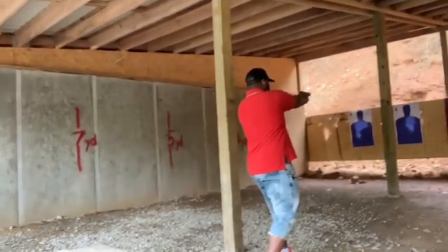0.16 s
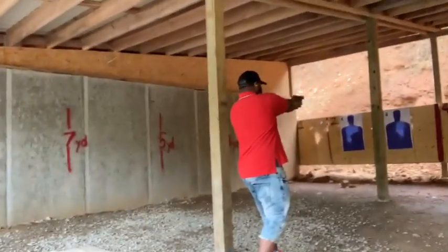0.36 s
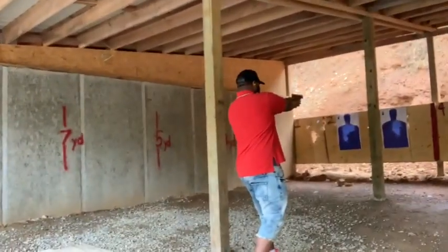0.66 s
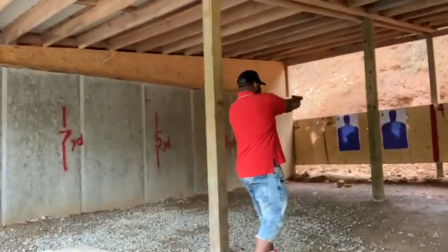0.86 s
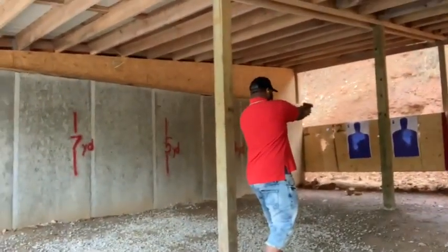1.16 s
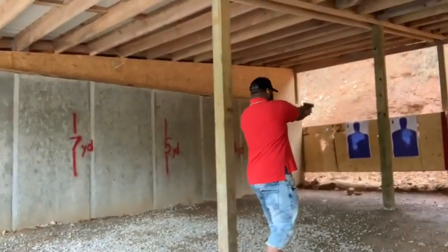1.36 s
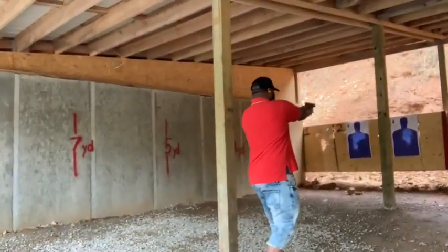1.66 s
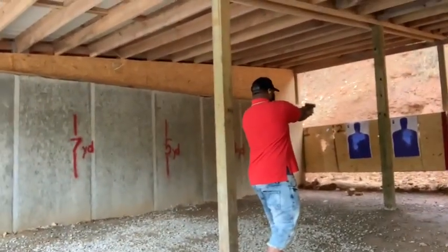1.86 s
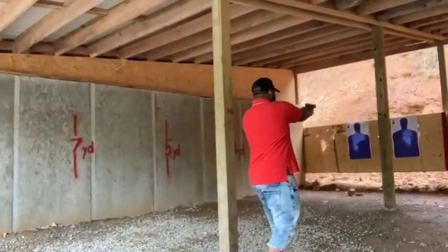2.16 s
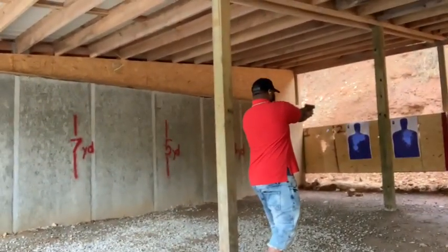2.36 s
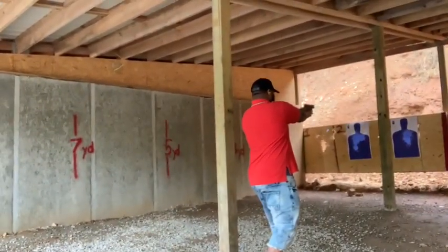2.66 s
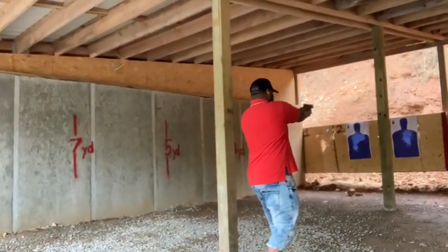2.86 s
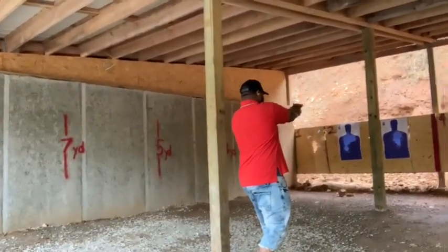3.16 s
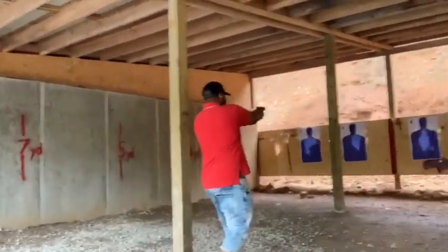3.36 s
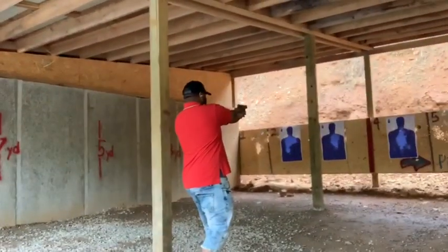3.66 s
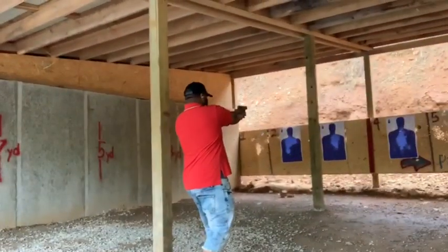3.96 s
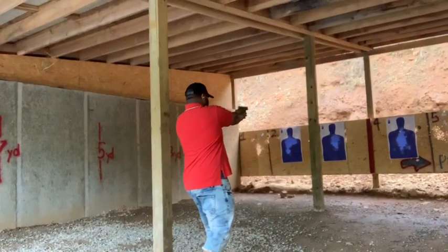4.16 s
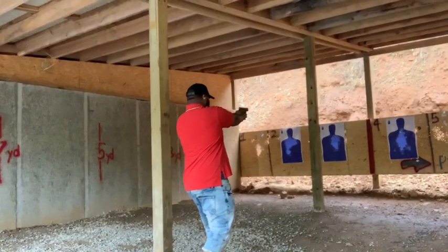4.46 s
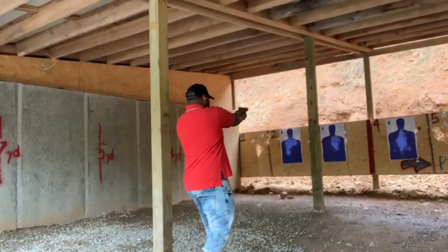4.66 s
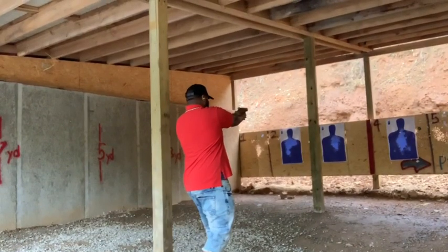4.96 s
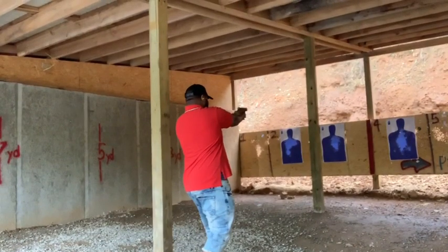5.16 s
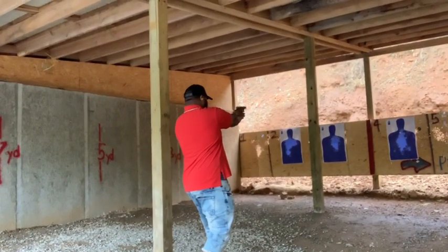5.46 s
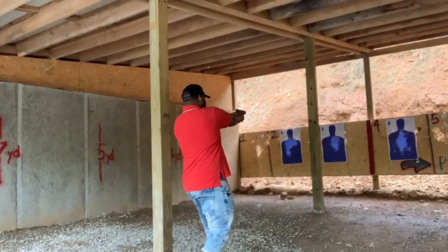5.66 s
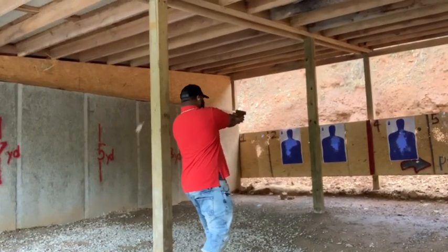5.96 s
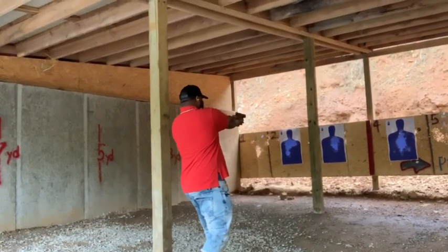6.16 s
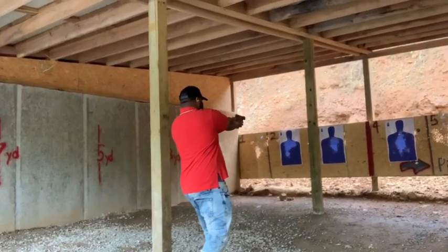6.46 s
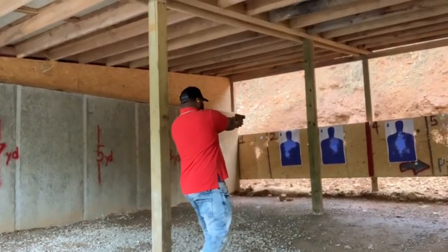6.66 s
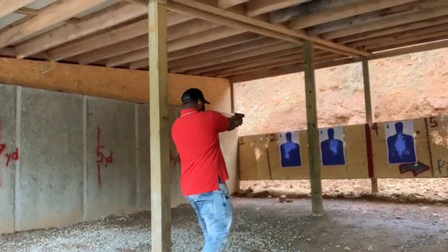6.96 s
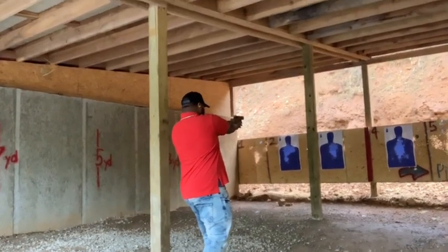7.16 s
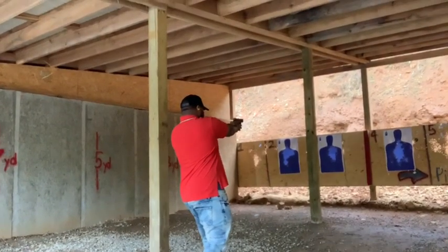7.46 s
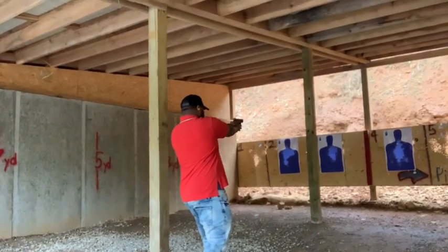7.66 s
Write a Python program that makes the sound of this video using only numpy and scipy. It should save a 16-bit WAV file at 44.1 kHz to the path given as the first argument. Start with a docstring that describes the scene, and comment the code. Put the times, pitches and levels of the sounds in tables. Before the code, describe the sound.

Heard from a few metres behind, a pistol fires at once, then near three and five and a half seconds. Each crack swells into a flattened, boomy blast under a timber roof and rolls away. Casings clink, shoes crunch gravel after the first shot, small things knock wood, and the hand-held microphone is softly bumped. A faint low background continues.

```python
"""Three slow pistol shots under the timber roof of a concrete-walled range, heard from a few metres behind.
Each is shaped noise: a bright crack, a push of gas, a boom in the shelter and a roll off the earth bank;
a limiter flattens it into a long blast. In between, brass cases ring as decaying modes, cases and debris
knock on timber, shoes grind gravel as clumped noise and the hand-held camera is bumped, a damped low tone.
Beneath lies low-weighted background noise whose level drifts and drops near the end."""
import sys
import numpy as np
from scipy import signal
from scipy.io import wavfile

SR = 44100
rng = np.random.default_rng(int(sys.argv[2]) if len(sys.argv) > 2 else 0)


def persist_wave(psi):
    """Save psi, clipped to +-1, as 16-bit WAV."""
    counts = np.round(np.clip(psi, -1, 1) * 32767).astype(np.int16)
    wavfile.write(sys.argv[1], SR, np.atleast_2d(counts).T)


N = 345303
FRAME = 4096  # samples in one short-time spectrum
HZ = np.fft.rfftfreq(FRAME, 1 / SR)[:, None]  # frequency axis of every spectrum
BRIEF = np.arange(24576) / SR  # time axis of a brief sound (s)


def amp(db):
    """Level: decibels become an amplitude ratio."""
    return 10 ** (np.asarray(db) / 20)


def read(points):
    """Spectrum: a table over frequency is interpolated on a logarithmic axis."""
    hz, value = np.transpose(points)
    return np.interp(np.log(HZ + 1), np.log(hz + 1), value)


def add(mix, s, sound):
    """Superposition: a sound is added at time s; whatever falls outside the mix is cut off."""
    start = round(s * SR)
    sound = sound[..., max(-start, 0):]
    part = mix[:, max(start, 0):][:, :sound.shape[-1]]
    part += sound[..., :part.shape[1]]


def decay(t, t60):
    """Exponential decay: the level falls by 60 dB in t60 seconds."""
    return np.exp(-np.log(1000) * t / t60)


def strike(t, rise, t60=np.inf):
    """Impact envelope: a quick swell, then an exponential decay."""
    return (1 - np.exp(-(t / rise) ** 2)) * decay(t, t60)


def peak(hz, width, db):
    """Resonance: a bell-shaped lift in dB over frequency (a dip if db is negative)."""
    return db / (1 + ((HZ - hz) / width) ** 2)


def lowpass_db(hz, order):
    """Low-pass slope: the level in dB falls ever faster above hz."""
    return -20 * np.log10(1 + (HZ / hz) ** order)


def lumps(size, span):
    """Smoothed noise: random swings of unit size, each lasting about span seconds."""
    kernel = np.hanning(round(span * SR) + 3)
    return signal.oaconvolve(rng.standard_normal(size), kernel / np.linalg.norm(kernel), "same")


def near_echoes():
    """Comb filtering: near surfaces throw every sound back, which ripples its spectrum."""
    # early reflections: delay/s, strength/(relative amplitude)
    echoes = [(.0034, 0.039), (.0066, .1), (.0091, .1), (0.0145, .12), (.0187, .13), (0.025, .13)]
    return abs(1 + sum(strength * np.exp(-2j * np.pi * HZ * delay) for delay, strength in echoes))


def two_ports(first, second):
    """Spatial coherence: two independent noises become a partly correlated left and right."""
    # coherence of the two microphone ports: f/Hz, likeness/(0 to 1)
    likeness = [(130, .985), (300, .9), (520, .55), (1100, .55), (1700, .28), (4500, .1), (8000, .3),
                (12000, .78)]
    # phase by which left leads: f/Hz, phase/rad
    phase_lead = [(60, 0), (350, .08), (600, .4), (1200, .45), (2400, 3.1), (5800, 12.7), (11000, 22),
                  (15500, 34)]
    # left minus right: f/Hz, level/dB
    balance = [(60, 0.5), (110, -0.5), (200, 0.5), (380, -1.0), (700, -1.5), (1290, -1), (2380, -1),
               (4400, -0.5), (8120, 4.5), (15000, 2)]
    same = np.clip(read(likeness), 0, 1)
    side = amp(read(balance) / 2)  # each port takes half the difference
    left = first * (side * np.exp(1j * read(phase_lead)))
    right = (same * first + np.sqrt(1 - same ** 2) * second) / side
    return np.array([left, right])


def diffuse(colour_db, t60=np.inf, size=len(BRIEF)):
    """Diffuse field: dense noise at both ports, near unit level at first, each frequency with its own t60."""
    noise = rng.standard_normal((2, size))
    _, t, (first, second) = signal.stft(noise, SR, nperseg=FRAME)
    gain = amp(colour_db) * near_echoes()
    gain = gain / np.sqrt(np.mean(gain ** 2)) * decay(t, t60)
    return signal.istft(two_ports(first, second) * gain, SR, nperseg=FRAME)[1][:, :size]


def background():
    """Coloured noise: low-weighted background noise, its level drifting and dropping near the end."""
    # spectrum of the background: f/Hz, relative level/dB
    background_colour = [(20, -3), (55, -1), (120, -2), (250, -11), (500, -14), (1000, -19.5),
                         (2000, -24.5), (4000, -33), (8500, -34.5), (12000, -48), (16000, -55.5)]
    # slow drift about the base level: t/s, level/dB
    drift = [(2, 1), (5, -1), (7.2, -0.5), (7.45, -4)]
    base_db = -70
    level_db = base_db + np.interp(np.arange(N) / SR, *np.transpose(drift))
    return amp(level_db) * diffuse(read(background_colour), size=N)


def bump(db, hz, length):
    """Heavily damped vibration: a soft, brief low tone with a dull rub of low noise."""
    t = BRIEF
    rub_db = -13  # relative to the thud; the rub of fingers on the camera
    thud = np.sin(2 * np.pi * hz * t) * np.sin(np.pi * t / length) ** 2 * (t < length)
    rub = diffuse(lowpass_db(260, order=3)) * strike(t, rise=.004, t60=0.34)
    return amp(db) * (thud + amp(rub_db) * rub)


def step(grit_db, weight_db, t60):
    """Granular friction: a sole grinds fine grit and coarser stones in clumps over a dull tread."""
    # spectrum of fine grit: f/Hz, relative level/dB
    grit = [(1200, -22), (3000, -7), (6500, -4), (8400, 2), (11400, -6.5), (14800, -6), (16000, -21)]
    # spectrum of coarser stones: f/Hz, relative level/dB
    crunch = [(500, -10), (1100, -2), (2000, -4.5), (3200, -6), (4500, -9.5), (8000, -16), (16000, -33)]
    # spectrum of the dull tread: f/Hz, relative level/dB
    tread = [(60, -17), (200, -2.5), (430, -2), (600, -8.5), (850, -6.5), (2000, -21), (8000, -69)]
    crunch_db = -2 + .55 * weight_db  # relative to grit; more weight turns more stones
    clump_db = 1.8
    rise = .022 * t60  # a slow step also swells slowly
    power = 0
    for colour, db in (grit, 0), (crunch, crunch_db), (tread, weight_db):
        unit_power = np.mean(amp(read(colour)) ** 2)
        power = power + amp(read(colour) + grit_db + db) ** 2 / unit_power
    clumps = amp(clump_db * lumps(len(BRIEF), span=.006))
    grind = np.sqrt(power.mean()) * diffuse(10 * np.log10(power))
    return grind * clumps * strike(BRIEF, rise, t60)


def tick():
    """Contact noise: a small hard thing strikes, bright and brief; the shelter answers briefly."""
    # spectrum of the contact: f/Hz, relative level/dB
    tick_colour = [(300, -52), (2500, -13), (5500, -6), (8500, -1.5), (11000, -6.5), (14500, -17),
                   (16000, -14)]
    contact = strike(BRIEF, rise=0.00055, t60=0.13)
    answer = amp(-9.5) * strike(BRIEF, rise=0.022, t60=0.62)
    return diffuse(read(tick_colour)) * (contact + answer)


def knock(db, hz):
    """Impact on a resonant body: a small thing knocks on timber, which rings; the shelter answers briefly."""
    # spectrum of the body of the knock: f/Hz, relative level/dB
    knock_colour = [(100, -21), (450, 0), (750, 2), (1400, -0.5), (2500, -9.5), (4000, -15.5), (7000, -37),
                    (16000, -52)]
    t = BRIEF
    # the struck spot lifts its own frequency and leaves a shallow dip an octave above
    struck_db = peak(hz, width=27, db=14) + peak(2 * hz, width=70, db=-3)
    contact = strike(t, rise=0.00054, t60=0.046)
    answer = amp(-15.5) * strike(t, rise=.01, t60=0.53)
    body = diffuse(read(knock_colour) + struck_db) * (contact + answer)
    ring_db, tick_db = -12, -31  # relative to the body
    upper_db, upper_ratio = -4, 1.94  # relative to the main ring
    tones = np.sin(2 * np.pi * hz * t) + amp(upper_db) * np.sin(2 * np.pi * upper_ratio * hz * t)
    ring = tones * strike(t, rise=.0005, t60=0.12)
    return amp(db) * (body + amp(ring_db) * ring + amp(tick_db) * tick())


def bounces(count):
    """Restitution: a case bounces to rest, every hop shorter and weaker, each on a slightly different spot."""
    start_s, start_db, spot_hz = 6.529, -46, 1403
    first_hop_s, hop_kept = .127, .66  # each hop lasts this share of the one before
    hop_loss_db = 2.5
    hop = np.arange(count)
    times = start_s + first_hop_s * (1 - hop_kept ** hop) / (1 - hop_kept)  # geometric sum of hops
    levels_db = start_db - hop_loss_db * hop
    spots_hz = spot_hz * rng.uniform(0.763, 1.237, count)
    return list(zip(times, levels_db, spots_hz))


def clink(tick_db, ring_db, ring_hz):
    """Modal ringing: a contact tick and a ringing brass tube, its upper modes stronger the harder the hit."""
    # upper modes at a hard hit: ratio/(multiple of the main ring), level/dB, t60/s
    upper_modes = [(.86, -15, .48), (.872, -14, 0.41), (1.615, -7, 0.21)]
    t = BRIEF
    # a tick of hard_db or more wakes the upper modes fully; a softer one leaves mostly the main ring
    hard_db, wake_slope = -52.5, 1.4  # slope in dB per dB
    upper_db = wake_slope * min(tick_db - hard_db, 0)
    split_hz = 45
    modes = [(1, -1, 0.5), (1 + split_hz / ring_hz, -3, 0.2)]  # the main ring is a beating pair
    modes += [(ratio, db + upper_db, t60) for ratio, db, t60 in upper_modes]
    tube = sum(amp(db) * np.exp(2j * np.pi * ring_hz * ratio * t) * decay(t, t60) for ratio, db, t60 in modes)
    port_phase = np.exp(1j * rng.uniform(-2.0, 1, (2, 1)))  # out of step at the two ports
    ring = (tube * port_phase).real * strike(t, rise=0.00043)
    return amp(tick_db) * tick() + amp(ring_db) * ring


def standing_waves():
    """Room modes: standing waves of the shelter lift narrow bands."""
    # shelter resonances: f/Hz, width/Hz, level/dB
    shelter = [(114.6, 7.2, 16), (335.6, 2.4, 5.5), (397.7, 16, 2), (434, 3.3, 2.5), (692, 7, 6),
               (810, 4.3, 8.5), (900, 3, 1.5), (1460, 5.6, 3)]
    return sum(peak(*wave) for wave in shelter)


def far_roll(t):
    """Late reverberation: a slow roll returns from the surroundings, its treble dying first."""
    # spectrum of the roll: f/Hz, relative level/dB
    roll_colour = [(20, -9), (80, -5.5), (200, -2), (400, -3), (900, -3.5), (1500, -8.5), (3000, -13.5),
                   (6000, -28.5), (10000, -35.5), (16000, -56.5)]
    # decay of the roll: f/Hz, t60/s
    roll_t60 = [(60, 2.4), (400, 2.045), (1200, 1.865), (4000, 1.603), (12000, 1.1)]
    return diffuse(read(roll_colour) + standing_waves(), read(roll_t60), len(t)) * strike(t, rise=.1)


def shelter_boom(t):
    """Reverberation in an enclosure: the boom between roof and walls, coloured by their standing waves."""
    # spectrum of the boom: f/Hz, relative level/dB
    boom_colour = [(20, -24.5), (75, -20.5), (220, -9), (400, -4.5), (600, -3.5), (900, -2.5), (1150, -6.5),
                   (1500, -13), (2800, -17), (4300, -25), (9000, -31.5), (12000, -42), (16000, -51.5)]
    # decay of the boom: f/Hz, t60/s
    boom_t60 = [(40, 0.53), (150, 0.71), (400, 0.75), (1000, 0.69), (3000, 0.57), (8000, 0.53),
                (14000, 0.44)]
    built_up = 0.88  # share of the lift: the standing waves are still growing during the boom
    colour_db = read(boom_colour) + built_up * standing_waves()
    return diffuse(colour_db, read(boom_t60), len(t)) * strike(t, rise=0.015)


def gas_push():
    """Volume source: expanding muzzle gas gives a low push."""
    return diffuse(lowpass_db(65, order=4)) * strike(BRIEF, rise=0.0067, t60=.5)


def muzzle_crack():
    """Impulsive shock: a bright broadband crack, with a short, brighter treble burst 12 ms after it begins."""
    # spectrum of the crack: f/Hz, relative level/dB
    crack_colour = [(30, -21), (300, -3), (900, 0.5), (2500, -3), (4500, -8.5), (8500, -8), (11500, -15),
                    (15000, -19.5), (16000, -26.5)]
    burst_s, burst_db, burst_hz = 0.012, -5, 7000  # delay, level relative to the crack, lower edge
    crack = diffuse(read(crack_colour)) * strike(BRIEF, rise=0.012, t60=0.35)
    highpass_db = -20 * np.log10(1 + (burst_hz / (HZ + 1)) ** 2)
    burst = diffuse(read(crack_colour) + highpass_db) * strike(BRIEF, rise=0.0014, t60=0.054)
    add(crack, burst_s, amp(burst_db) * burst)
    return crack


def shot(crack_db, boom_db, roll_db, push_db):
    """Direct sound and reverberation: crack and gas push over the boom and the far roll."""
    t = np.arange(round(2.4 * SR)) / SR
    uneven_db = 1.2
    blast = amp(boom_db) * shelter_boom(t) + amp(roll_db) * far_roll(t)
    blast = blast * amp(uneven_db * lumps(len(t), span=0.02))  # echoes arrive in clusters
    add(blast, 0, amp(crack_db) * muzzle_crack() + amp(push_db) * gas_push())
    return blast


def scene():
    """Superposition: small sounds and shots are summed over the background noise."""
    # soft low bumps on the camera, and one dull footfall (at 1.985 s): t/s, thud level/dB, f/Hz, length/s
    bump_events = [(-.015, -31, 178.5, 0.081), (.867, -36, 106.6, 0.031), (1.102, -33.5, 238, 0.019),
                   (1.122, -34.5, 210, .023), (1.218, -41.5, 118, 0.018), (1.276, -33, 114.4, .028),
                   (1.724, -46, 131, 0.02), (1.985, -50.5, 374, 0.04), (3.123, -50, 139, 0.023),
                   (7.142, -39.5, 188.6, .023)]
    # shoes on gravel: t/s, grit level/dB, weight (tread relative to grit)/dB, t60/s
    step_events = [(1.81, -62.5, -1, 0.31), (1.864, -58, -6.5, 0.44), (1.96, -56, 0, 0.94),
                   (2.09, -58, -2.5, 0.59), (2.187, -57.5, -6.5, 0.58), (2.298, -57, -1, 0.69),
                   (2.53, -57.5, 6.5, 0.3), (2.734, -64.5, -5, 0.23), (2.785, -59, -2.5, 0.31),
                   (2.85, -66, 3, 0.27), (2.924, -65, 0.5, .3), (4.71, -69, -16, 0.36),
                   (5.17, -69, -5.5, 0.52), (5.25, -69.5, -1.5, 0.55), (6.035, -61, -22, .33),
                   (6.36, -68.5, -17, .5)]
    # dull knocks of cases and debris on timber: t/s, level/dB, resonance of the struck spot f/Hz
    knock_events = [(1.281, -52, 600), (2.522, -46, 1500), (2.645, -57.5, 1506), (6.217, -33, 675),
                    (7.006, -55, 1293)]
    # brass cases clinking on stone, and one faint dry click beside a bump (at 7.152 s):
    # t/s, tick level/dB, ring level/dB, ring f/Hz
    clink_events = [(.98, -47.5, -58, 8430), (1.12, -60.5, -62.5, 8560), (1.309, -61, -78, 8560),
                    (4.461, -52.5, -50, 8590), (6.531, -68, -57, 8600), (7.152, -73, -87, 8560),
                    (7.439, -58.5, -57.5, 8580), (7.594, -69.5, -65.5, 8620)]
    # shots ahead of the limiter: t/s, crack level/dB, boom level/dB, roll level/dB, gas push level/dB
    shot_events = [(.058, 17.5, 19.5, -15.5, -3), (3.173, 12, 14, -23, -7), (5.513, 5.5, 6.5, -29.5, -2)]
    mix = background()
    sources = [(bump, bump_events), (step, step_events), (knock, knock_events + bounces(count=5)),
               (clink, clink_events), (shot, shot_events)]
    for source, events in sources:
        for s, *settings in events:
            add(mix, s, source(*settings))
    return mix


def limit(x, ceiling_db, window):
    """Look-ahead limiting: the smoothed level is held near a ceiling until the blast dies down below it."""
    kernel = np.hanning(round(window * SR))
    power = abs(signal.oaconvolve((x ** 2).mean(0), kernel / kernel.sum(), "same"))
    return x / (1 + (power / amp(ceiling_db) ** 2) ** 3) ** (1 / 6)


def record(dry):
    """Dynamic compression: limiter, sag in level during the first blast, rounded peaks and band limits."""
    # sag of the level during the first blast: t/s, level/dB
    sag = [(.06, 3), (.12, 1), (.18, -3), (.26, -12), (.36, -11.5), (.46, -8), (.54, -2.5), (.62, -1.5)]
    sag_db = np.interp(np.arange(N) / SR, *np.transpose(list(sag) + [(.72, 0)]))  # back to 0 dB at 0.72 s
    held = limit(dry, ceiling_db=-11.3, window=0.021) * amp(sag_db)
    rounded = held / (1 + held ** 6) ** (1 / 6)
    highpass = signal.butter(2, 18, "high", fs=SR, output="sos")
    lowpass = signal.firwin(401, 15900, window=("kaiser", 9), fs=SR)
    return signal.oaconvolve(signal.sosfilt(highpass, rounded), lowpass[None], "same")


dry = scene()
out = record(dry)
persist_wave(out)
```